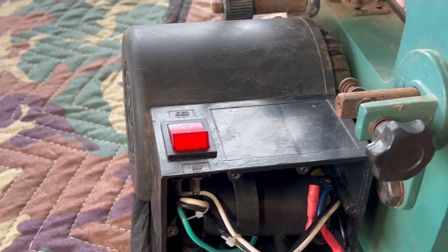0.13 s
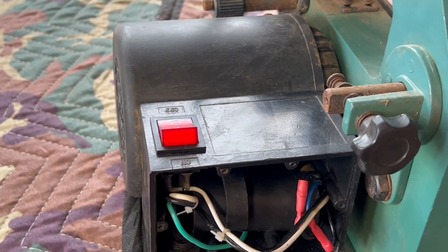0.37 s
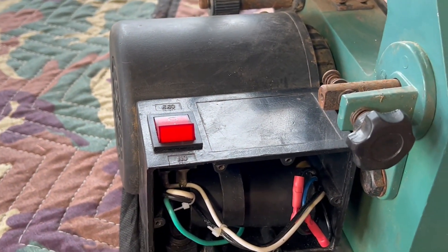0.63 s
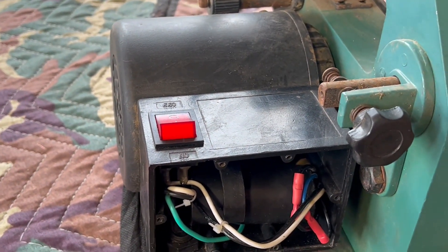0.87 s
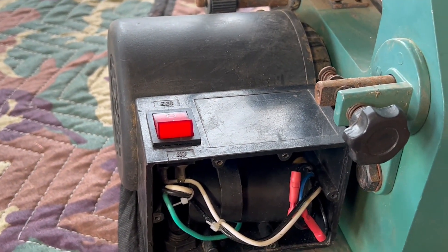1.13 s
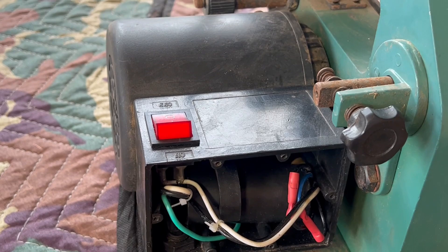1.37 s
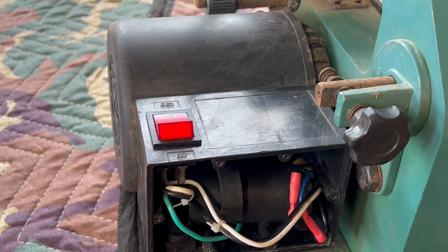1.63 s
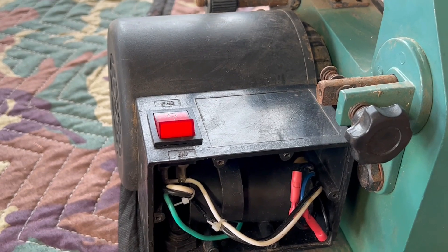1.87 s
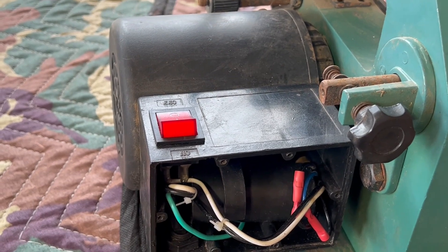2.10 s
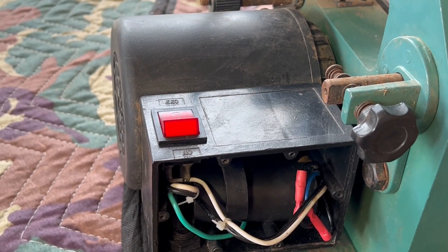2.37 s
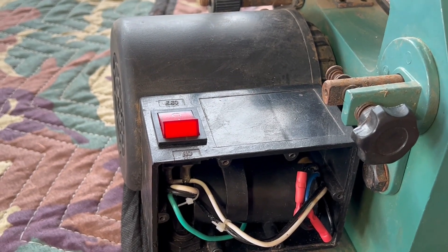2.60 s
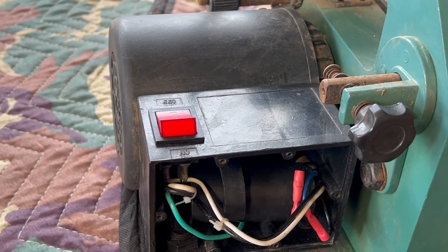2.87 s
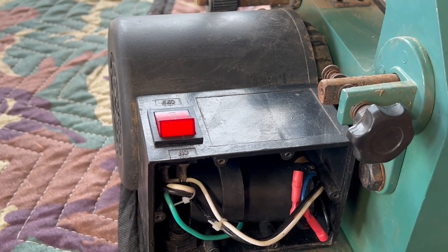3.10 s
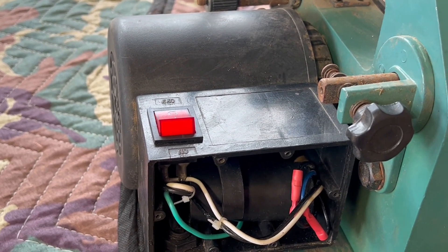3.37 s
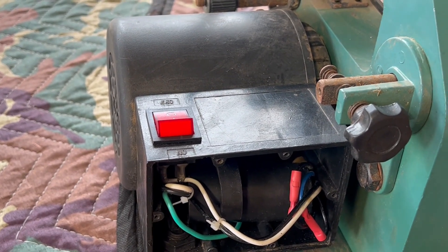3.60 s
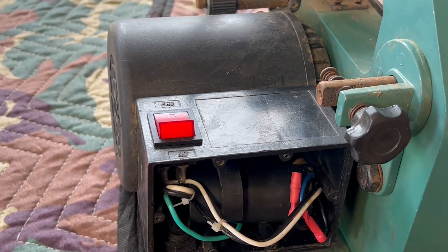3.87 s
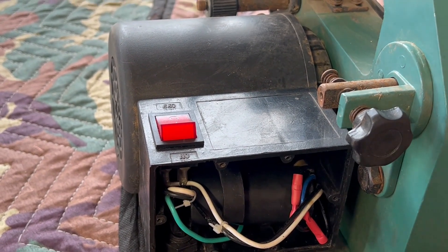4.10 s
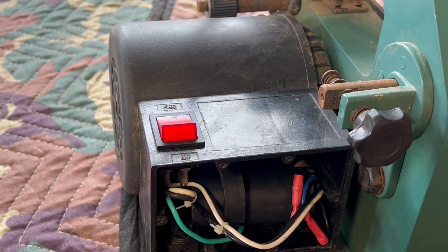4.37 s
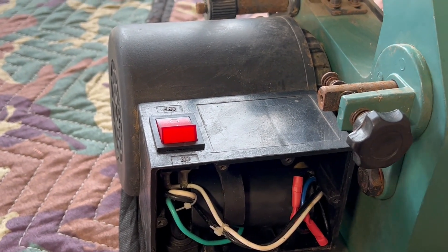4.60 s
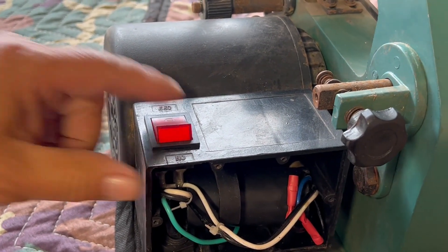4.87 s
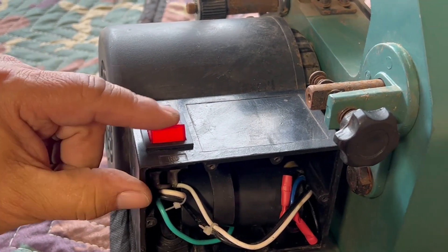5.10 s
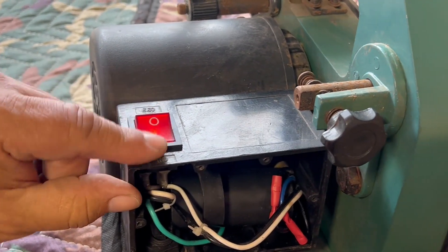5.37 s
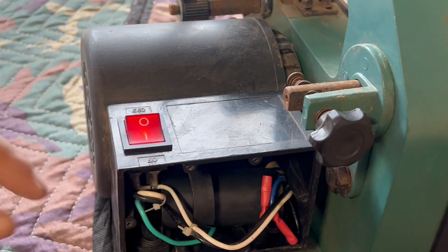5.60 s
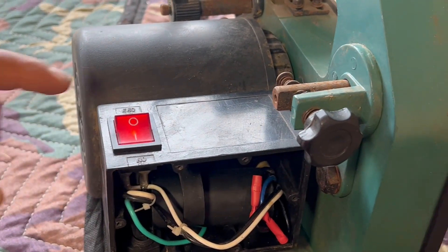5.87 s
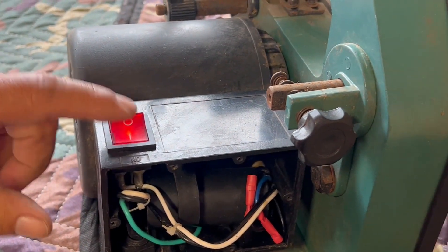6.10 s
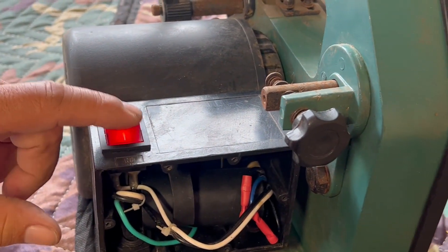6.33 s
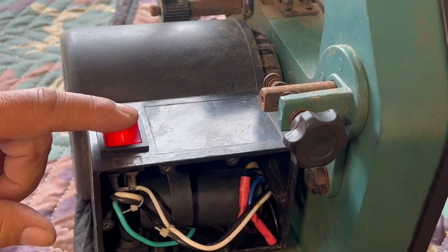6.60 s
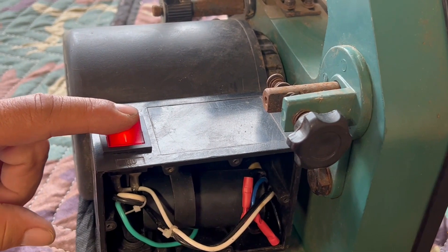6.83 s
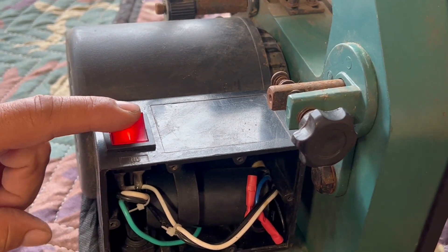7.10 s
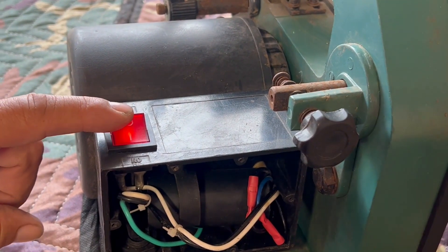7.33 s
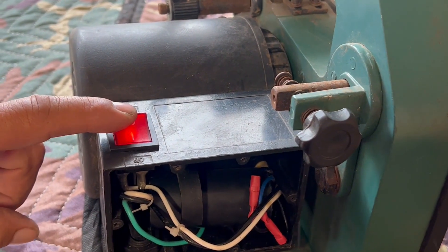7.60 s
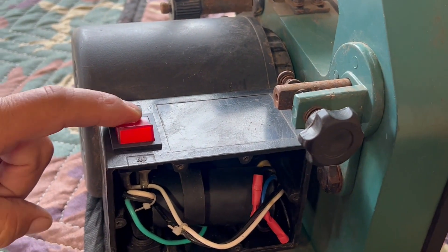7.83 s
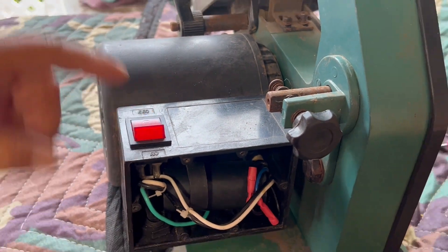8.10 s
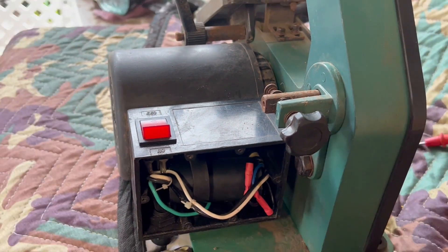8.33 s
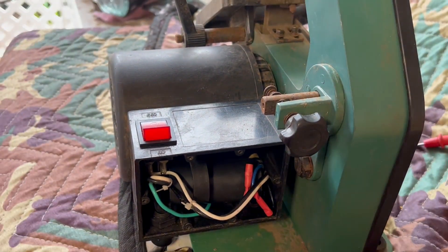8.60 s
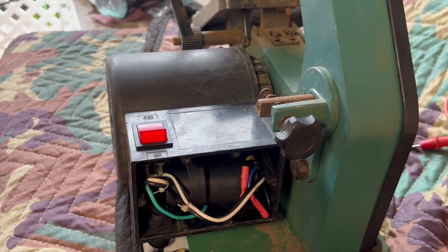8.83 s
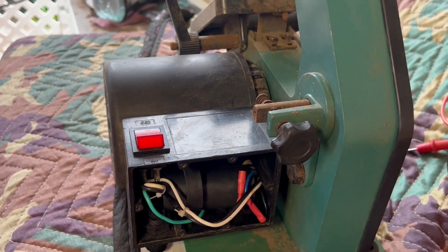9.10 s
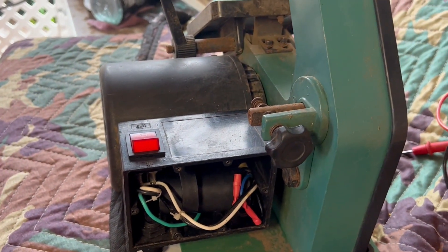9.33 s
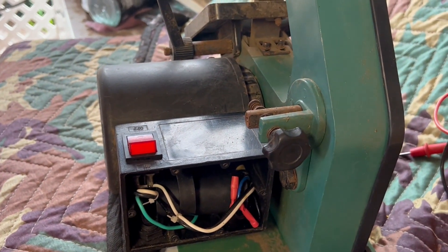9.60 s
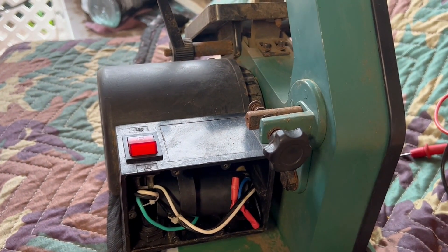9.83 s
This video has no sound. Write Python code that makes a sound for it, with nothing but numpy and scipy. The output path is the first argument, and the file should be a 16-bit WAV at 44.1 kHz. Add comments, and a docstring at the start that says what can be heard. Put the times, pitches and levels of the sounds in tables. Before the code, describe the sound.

Close stereo pickup of a belt sander on a padded surface indoors. Soft fabric rustles and a hollow body knock come over dull room rumble, then a hard plastic switch click starts the electric motor. It whirs up quickly, roars steadily with bearing grind and belt hiss, then a second click cuts power; pitch and level sink to a brief dry scrape and quiet.

```python
"""Low room rumble comes first, with cloth rubbing close by, then small ticks and knocks on a hollow body.
A small belt sander stands on a padded bench in a quiet workshop, heard close up through two microphone ports.
Its rocker switch snaps, the motor runs up, hums and roars through its housing, is switched off and coasts to rest.
Cloth and room are coloured noise and blows are decaying modes; bearing roar, hiss and shake follow the shaft."""
import sys
import numpy as np
from scipy import signal
from scipy.fft import rfft, irfft
from scipy.io import wavfile
from scipy.ndimage import uniform_filter1d, minimum_filter1d

SR = 44100
rng = np.random.default_rng(int(sys.argv[2]) if len(sys.argv) > 2 else 0)


def materialize(psi):
    """Save the field psi as 16-bit PCM at rate SR to the path in sys.argv[1].

    A 1-D psi becomes a single channel; in a 2-D psi each row is a channel.
    """
    bounded = np.clip(np.atleast_2d(psi).T, -1, 1)
    quanta = np.round(bounded * 32767).astype(np.int16)
    wavfile.write(sys.argv[1], SR, quanta)


def field_ratio(decibels):
    """Amplitude ratio for a level in dB (20 dB per decade); scalars and array-likes work."""
    return 10 ** (np.asarray(decibels, dtype=float) / 20)


N = 439236
TIME = np.arange(N) / SR

# colour of the quiet room: f/Hz, density level/dB per Hz (relative)
ROOM_COLOUR = [(15, -49), (25, -28), (54, 2.5), (107, -12.5), (147, -14.5), (208, -23.5), (235, -22),
               (266, -28), (530, -37), (645, -38), (1080, -37), (9000, -74.5), (11700, -102), (19800, -120)]
ROOM_DB = -43.5
# stereo width of the room: f/Hz, side against mid level/dB
ROOM_SIDE = [(40, -30), (130, -16.5), (600, -5.5), (1500, 0.5), (4000, -11.5), (15000, -12.5)]
# stereo width of the motor and the cloth: f/Hz, side against mid level/dB
NEAR_SIDE = [(60, -28), (110, -6), (300, -14), (1300, -14), (3000, -8.5), (6000, -17), (15000, -50)]

# quick flicks of cloth: peak at t/s, dull level/dB, bright level/dB
FLICKS = [(.316, -69, -69), (.37, -74, -74), (.826, -72, -75), (.994, -66, -78), (1.416, -67, -67),
          (1.508, -61, -76), (1.606, -75, -86), (2.226, -68, -84), (2.55, -66, -62.5), (2.724, -62, -86),
          (2.968, -53, -61), (3.172, -69, -71), (3.27, -80, -69), (3.47, -61, -71), (3.888, -70, -90),
          (4.07, -61.5, -61), (4.826, -38.5, -46.5), (5.213, -43, -50), (9.946, -47.5, -58)]
FLICK_RISE_S, FLICK_FADE_DB = 0.01, 422   # fade in dB per s
# longer rubs of cloth and fingers: loudest at t/s, swell t/s, fade t/s, dull level/dB, bright level/dB
RUBS = [(.1, 0.086, .12, -61.5, -54), (.24, .12, 0.067, -63.5, -61), (.52, .05, .08, -57.5, -62),
        (.63, .12, 0.087, -56, -53.5), (3.58, 0.079, 0.085, -41, -41), (3.7, .05, 0.27, -74, -74),
        (4.12, .05, 0.3, -82, -73.5), (4.38, 0.094, 0.075, -59, -57), (5.03, .25, 0.13, -61.5, -62.5),
        (5.254, 0.048, 0.077, -40.5, -46.5), (9.58, 0.032, .07, -60.5, -66), (9.78, 0.43, 0.36, -80, -69)]
RUB_END_DB = -23   # one swell time before the peak or one fade time after it
STIR_DB = (-76, -94.5)   # faint stirring between them: dull, bright

# small ticks: t/s, base level/dB, base f/Hz, left over right level/dB; ticks() sets each ring from these bases
TICKS = [(0.177, -46, 2310, 0), (.3197, -44, 7500, 1.5), (1.419, -43, 5130, 2), (1.61, -51, 8800, 1.5),
         (2.5451, -52, 2040, .4), (2.968, -33, 2220, 4), (3.1737, -54, 7500, 1.5), (3.27, -56, 7500, 1.5),
         (4.0716, -48, 8000, 1.5), (4.3867, -43, 8160, .4), (8.687, -27, 1260, 6), (9.5213, -34.5, 1280, 5),
         (9.537, -34, 1360, 8), (9.9448, -45, 2053, 5)]
# knocks on a hollow body: t/s, level/dB, spot (0 rim, 1 middle)
KNOCKS = [(.4672, -39, 0), (3.4905, -17, 1)]
# modes of the hollow body, against the knock: f/Hz, rim level/dB, middle level/dB, t60/s
HOLLOW_MODES = [(203, -16, -8, .8), (236, -20, -10, .2), (366, -5, -32, .9), (392, -20, -8, .24),
                (535, -6, -6, .24), (600, -8, -16, .1), (972, -20, -21, .16), (1060, -22, -25, .2),
                (1305, -20, -20, .18), (1395, -9, -16, .22), (1643, -20, -21, .15), (1850, -8, -15, .12),
                (2035, -12, -17, .1), (2287, -18, -15, .15), (2670, -9, -22, .08)]
CRACK_DB, CRACK_T60_S = -9, 0.16   # noise burst of a knock, against its level

# faint thin squeaks: t/s, f/Hz, level/dB
SQUEAKS = [(4.92, 7260, -45), (4.94, 7350, -47), (5.318, 5600, -28), (5.321, 4400, -34)]
SQUEAK_T60_S, SQUEAK_RISE_S = .05, .008
# switch snaps: t/s, spring level/dB, landing level/dB
SNAPS = [(5.3378, 1.2, -1.5), (7.7664, -2, -5)]
# switch modes, spring above 5 kHz and landing rocker below: f/Hz, level/dB against the snap, t60/s, delay t/s
ROCKER_MODES = [(8800, 0, .0045, .0003), (7400, -3, .0045, .0004), (3000, -11, .012, 0),
                (4200, -14, .01, .0008), (12500, -20, .004, 0), (6300, -16, .008, .002),
                (2050, -5, .013, .0026), (1100, -19, .02, .001)]

ON_S, OFF_S, HALT_S = 5.34, 7.77, 9.548
FULL_SPEED = 58.75   # shaft turns per s
CAGE_RATIO = 23.88 / 58.75   # cage turns per shaft turn
# run-up: length, power of time by which it gains pace, rounding near full speed
RUN_UP_S, RUN_UP_POWER, SETTLE_S = .475, 1.55, .07
# coasting: the dying field takes FIELD_BRAKE turns per s in all, friction is in turns per s per s
FIELD_BRAKE, FIELD_S, FRICTION = 12.2, .2, 22.75

# levels below come in pairs: bearing roar, fan and belt hiss
FULL_DB = (-23.5, -22)   # at full speed, before slow wander and flutter
LOSS_DB, LOSS_SQUARED_DB = (6.5, 7), (0.42, 1)   # coasting: per halving of speed, per halving squared
PULL_LOSS_DB, PULL_SQUARED_DB = (4.5, 3.5), (-0.06, 0.42)   # the same while power is on
JOLT_DB, JOLT_T60_S = (-30.5, -27), (0.13, 0.098)   # the jolt as current arrives
STALL_S, STALL_DB, STALL_OVER_S = 9.443, (-5.5, -8), 0.089   # the last roll dies away
# the belt scrapes to a halt: level, start before the halt, decay after it
SCRAPE_DB, SCRAPE_S, HALT_T60_S = (-48, -50), .11, 0.094
FLUTTER_DB = 0.89   # slow running is uneven: dB per halving
# slow wander of the running level, end values held before and after: t/s, level/dB
WANDER = [(5.6, -2), (5.8, 1), (5.95, 0.5), (6.15, 1), (6.3, 0.1), (6.55, -0.4), (6.8, -0.1), (7.05, 0.06),
          (7.38, 0.7), (7.75, -1.3), (8.0, -0.5)]

# housing resonances that the bearing excites: f/Hz, width f/Hz, level/dB, loss level/dB as speed halves
CASING = [(164.6, 70, -13.5, -1.5), (359.6, 36, -5.5, -0.5), (399.5, 21, -7, 1.5), (467.6, 36.5, -1, 0),
          (516, 26, 0, 1), (595, 88, -4.5, 2), (704, 94, -5, 0), (909, 128, -4.5, 2.5),
          (1040, 145, -4, 0.5), (1174, 162, -3, 2), (1311, 62, -2.5, 2), (1450.8, 140, -11.5, 0.5),
          (1566, 48, -7.5, 0.5), (1683, 106, -10.5, -0.5)]
# guard and frame resonances that colour the hiss: f/Hz, width f/Hz, level/dB, loss level/dB as speed halves
GUARD = [(2058, 180, -1.5, -1), (2490, 317, -5, -2), (2978, 100, -2.5, -2), (3320, 156, 0.5, 0),
         (3895, 256, 0, -1), (4492, 220, 1, -0.5), (5090, 470, -5, 1), (5636, 136, 0, 1.5),
         (5957, 107, 1, 1.5), (6450, 340, -1.5, 1.5), (7200, 630, -2, 1), (8220, 1320, -5, 1.5),
         (9530, 1300, -6, 2.5), (11090, 1070, -5.5, 3), (13800, 2600, -10, 4), (14700, 3000, -11, 3.5)]
# steady tones at full speed: multiple of the shaft turn, peak level/dB against the roar's rms
SHAFT_ORDERS = [(3, -30.5), (4, -23), (6, -13)]
# steady tones of the bearing cage: multiple of the cage turn, peak level/dB against the roar's rms
CAGE_ORDERS = [(7, -27.5), (19, -17), (24, -17.5), (28, -19.5), (32, -20), (36, -15), (37, -23), (42, -28),
               (44, -16), (50, -17), (51, -19.5), (53, -14.5), (61, -17)]
ONCE_DB, ONCE_LOSS_DB = -37.5, 88   # unbalance once a turn: rms level, loss per halving squared
# twice-a-turn shake as the bench passes it on: f/Hz, level/dB
BENCH = [(40, -68.5), (54, -50), (65, -36), (72, -30), (78, -42), (84, -32), (93, -56), (100, -38.5),
         (115, -37)]
BEAT_S, BEAT_TOP_S, BEAT_DEPTH = 1.96, 6.23, 0.68   # slow beat of that shake: period, loudest at, depth 0-1

MAINS_HZ = 60
# winding buzz under the starting current: multiple of twice the mains rate, starting rms level/dB
BUZZ = [(6, -55), (11, -50), (12, -53.5), (13, -49), (14, -58)]
BUZZ_FADE_DB = 13   # dB per s

# treble reaches the two microphone ports by unequal paths: f/Hz, phase between them/turns
PORT_LAG = [(5000, 0), (7000, -.06), (8500, 0), (10200, .5), (12100, 1), (13900, 1.5), (15700, 2)]
SELF_NOISE_DB, TOP_HZ = -80, 15780   # microphone noise before its colouring, highest frequency kept
DUCK_ABOVE, DUCK_DB, DUCK_AFTER_S, DUCK_HOLD_S = .3, -11, .004, .007


def rms_one(x):
    """Scale to unit rms."""
    return x / np.sqrt(np.mean(x ** 2) + 1e-20)


def in_time(rows):
    """One (t/s, value) curve at every sample."""
    return np.interp(TIME, *np.transpose(rows))


def shaped(x, points):
    """Colour a signal by (f/Hz, level/dB) points."""
    hz, db = np.transpose(points)
    bins = np.maximum(np.fft.rfftfreq(N, 1 / SR), 1)
    return irfft(rfft(x) * field_ratio(np.interp(np.log(bins), np.log(hz), db)), N)


def drift(rate):
    """Smooth random wander of spread near 1, drawn afresh rate times a second."""
    draws = rng.standard_normal(int(10 * rate) + 3)
    steps = uniform_filter1d(np.repeat(draws, 8), size=8)
    return 1.2 * np.interp(TIME * rate * 8, np.arange(len(steps)), steps)


def spread(mid, side, points):
    """Left and right from a middle and an unrelated side of like colour."""
    side = shaped(side, points)
    return np.array([mid + side, mid - side])


def resonate(x, peaks, halvings, waver_db):
    """Parallel resonances of alternating sign; each wavers, and fades in its own way as the speed drops."""
    out = 0
    for k, (hz, width, db, lost_db) in enumerate(peaks):
        r = np.exp(-np.pi * width / SR)
        poles = [1, -2 * r * np.cos(2 * np.pi * hz / SR), r * r]
        zeros = [(1 - r * r) / 2, 0, (r * r - 1) / 2]
        gain = (-1) ** k * field_ratio(db - lost_db * halvings + waver_db * drift(5))
        out = out + gain * signal.lfilter(zeros, poles, x)
    return out / np.std(out[..., halvings < .01])   # unit level at full speed


def add(out, s, hz, db, t60, rise_s=0.00025):
    """Strike one mode at s: a sine that rises fast and dies away exponentially."""
    at = int(s * SR)
    t = np.arange(min(int(t60 * SR), N - at)) / SR
    ring = np.sin(2 * np.pi * hz * t) * field_ratio(-60 * t / t60) * (1 - np.exp(-t / rise_s))
    out[..., at:at + len(t)] += np.multiply.outer(field_ratio(db), ring)


def room():
    """Lumpy low rumble fading into faint hiss: coloured noise at a gently wandering level."""
    noise = rms_one(shaped(rng.standard_normal((2, N)), ROOM_COLOUR))
    mid, side = noise * field_ratio(ROOM_DB + 0.69 * drift(3.174))
    return spread(mid, side, ROOM_SIDE)


def rustle():
    """Fibres slipping: noise with small grains, in a dull and a bright part."""
    gains = np.outer(field_ratio(STIR_DB), field_ratio(3.6 * drift(9.1)))
    for s, *db in FLICKS:
        near = slice(int((s - .05) * SR), int((s + .3) * SR))
        t = TIME[near] - s
        rise = np.clip(1 + t / FLICK_RISE_S, 0, 1) ** 2
        fade = field_ratio(-FLICK_FADE_DB * np.maximum(t, 0))
        gains[:, near] += np.outer(field_ratio(db), rise * fade)
    for s, swell_s, fade_s, *db in RUBS:
        near = slice(max(int((s - 2 * swell_s) * SR), 0), int((s + 2 * fade_s) * SR))
        t = TIME[near] - s
        from_peak = np.where(t < 0, -t / swell_s, t / fade_s)
        gains[:, near] += np.outer(field_ratio(db), field_ratio(RUB_END_DB * from_peak ** 1.76))
    grains = rng.standard_normal((2, N)) * field_ratio(1.74 * drift(200))
    dull = rms_one(shaped(grains, [(150, -2), (400, 5), (1200, 1.5), (2500, -1.0), (4000, -31.0)]))
    bright = rms_one(shaped(grains, [(1500, -40.5), (2600, -1.0), (6000, 2.5), (9000, -0.5),
                                     (12000, -10.0), (16000, -13.5)]))
    mid, side = gains[0] * dull + gains[1] * bright
    return spread(mid, side, NEAR_SIDE) * field_ratio([[.7], [-.7]])   # a little to the left


def ticks():
    """Small hard contacts: a main ring and two weaker modes, shorter the higher the pitch."""
    out = np.zeros((2, N))
    for s, base_db, base_hz, pan_db in TICKS:
        sides_db = base_db + np.array([pan_db, -pan_db]) / 2
        for ratio, db in ((1.02, 4.0), (0.5, -21.0), (1.1, -18.0)):
            add(out, s, min(base_hz * ratio, 15000), sides_db + db, 22 / base_hz)
    return out


def knocks():
    """A hollow body rings in modes weighted by the spot struck, under a short crack of noise."""
    out = np.zeros((2, N))
    crack_colour = [(500, -18), (1000, -5), (2200, 0.0), (6000, -8.0), (16000, -11)]
    crack = rms_one(shaped(rng.standard_normal(N), crack_colour))
    for s, knock_db, spot in KNOCKS:
        sides_db = knock_db + np.array([1.2, -1.2])
        for hz, *db, t60 in HOLLOW_MODES:
            add(out, s, hz, sides_db + db[spot], t60, rise_s=1.5 / hz)   # low modes build up later
        after = np.clip(TIME - s, 0, 1)
        burst = crack * (after > 0) * field_ratio(-60 * after / CRACK_T60_S) * (after < 1)
        out += np.outer(field_ratio(sides_db + CRACK_DB), burst)
    return out


def rocker_switch():
    """Faint squeaks come first, then the switch's spring and landing ring in short modes."""
    out = np.zeros((2, N))
    for s, hz, db in SQUEAKS:
        add(out, s, hz, np.full(2, db), SQUEAK_T60_S, rise_s=SQUEAK_RISE_S)
    for s, spring_db, landing_db in SNAPS:
        for hz, db, t60, delay in ROCKER_MODES:
            part_db = spring_db if hz > 5000 else landing_db
            add(out, s + delay, hz, np.full(2, db + part_db), t60)
    return out


def shaft_speed():
    """Turns per s: pulled up to full speed, then braked by the dying field and by friction."""
    pulled = FULL_SPEED * np.clip((TIME - ON_S) / RUN_UP_S, 0, 1) ** RUN_UP_POWER
    coast = np.maximum(TIME - OFF_S, 0)
    braked = FIELD_BRAKE * (1 - np.exp(-coast / FIELD_S)) + FRICTION * coast
    settled = uniform_filter1d(pulled, size=int(SETTLE_S * SR))
    return np.maximum(settled - braked, 0) * (TIME < HALT_S)


def running_gain(layer, halvings):
    """Level follows speed, with a slow wander; a jolt starts it, a stall and a scrape end it."""
    coasting = LOSS_DB[layer] * halvings + LOSS_SQUARED_DB[layer] * halvings ** 2
    pulling = PULL_LOSS_DB[layer] * halvings + PULL_SQUARED_DB[layer] * halvings ** 2
    loss = np.where(TIME < OFF_S, pulling, coasting)
    flutter = FLUTTER_DB * np.minimum(halvings, 2) * drift(25)
    stall = STALL_DB[layer] * np.exp(np.minimum(TIME - STALL_S, .1) / STALL_OVER_S)
    db = FULL_DB[layer] - loss + stall + flutter + in_time(WANDER)
    jolt = field_ratio(JOLT_DB[layer] - 60 * np.abs(TIME - ON_S - .003) / JOLT_T60_S[layer])
    scrape = field_ratio(SCRAPE_DB[layer]) * np.clip((TIME - HALT_S + SCRAPE_S) / .03, 0, 1)
    halted = field_ratio(-60 * np.maximum(TIME - HALT_S, 0) / HALT_T60_S)
    return (field_ratio(db) + jolt + scrape) * halted * (TIME > ON_S)


def bearing(cage, contacts_db, count=14):
    """Flaws meet the balls at the same cage angles on every turn, over a random rolling noise."""
    out = rng.standard_normal(N)
    for angle, size in rng.random((count, 2)):
        passing = np.diff(np.floor(cage + angle), prepend=np.floor(angle))
        out += passing * field_ratio(contacts_db + 4.0 * drift(30)) * (2 * size - 1)
    return out


def bearing_roar(angle, cage, halvings):
    """Rolling contacts throb with the cage and ring the housing; steady shaft and cage tones join in."""
    throb = 1 + 0.14 * np.cos(4 * np.pi * cage) + 0.12 * np.cos(6 * np.pi * cage + 0.77)
    roar = resonate(throb * bearing(cage, contacts_db=22), CASING, halvings, waver_db=1.0)
    tones = sum(field_ratio(db + 5.4 * drift(5)) * np.sin(k * angle + k * k) for k, db in SHAFT_ORDERS)
    tones += sum(field_ratio(db + drift(4)) * np.sin(k * 2 * np.pi * cage + k * k) for k, db in CAGE_ORDERS)
    return roar + tones * field_ratio(-30 * halvings)   # tones sink into the noise off full speed


def fan_hiss(angle, halvings):
    """Fan and belt noise swells with each turn and is coloured by guard and frame."""
    beat = 1 + 0.06 * np.cos(angle) + 0.11 * np.cos(2 * angle + 0.43)
    noise = beat * field_ratio(0.93 * drift(150)) * rng.standard_normal((2, N))
    return resonate(noise, GUARD, halvings, waver_db=0.77)


def bench_shake(angle, halvings):
    """Unbalance shakes the bench once a turn, and twice a turn with a slow beat under power."""
    once = field_ratio(ONCE_DB - ONCE_LOSS_DB * halvings ** 2 + 1.5 * drift(3)) * np.sin(angle)
    swell = 1 + BEAT_DEPTH * np.cos(2 * np.pi * (TIME - BEAT_TOP_S) / BEAT_S) * (TIME < OFF_S)
    twice = field_ratio(2.0 * drift(12)) * shaped(swell * (halvings < 2) * np.sin(2 * angle), BENCH)
    return np.sqrt(2) * (once + twice) * field_ratio([[.4], [-.4]])


def motor():
    """Roar, hiss and low shaking, all tied to the shaft angle."""
    speed = shaft_speed()
    all_halvings = np.clip(np.log2(FULL_SPEED / (speed + 1e-3)), 0, 6)
    halvings = np.minimum(all_halvings, 3)
    turns = np.cumsum(speed) / SR
    angle, cage = 2 * np.pi * turns, CAGE_RATIO * turns   # radians, turns
    roar = bearing_roar(angle, cage, halvings)
    hiss = fan_hiss(angle, halvings)
    roar_gain = running_gain(0, all_halvings) * field_ratio(0.78 * drift(14))
    hiss_gain = running_gain(1, all_halvings) * field_ratio(.5 * drift(14))
    side_roar = resonate(rng.standard_normal(N), CASING, halvings, waver_db=3.0)
    mid = roar_gain * roar + hiss_gain * hiss[0]
    side = roar_gain * side_roar + hiss_gain * hiss[1]
    return spread(mid, side, NEAR_SIDE) + bench_shake(angle, halvings)


def buzz():
    """Magnetic tones of the windings at fixed pitch, fading as the starting current falls."""
    t = np.maximum(TIME - ON_S, 0)
    tones = sum(field_ratio(db + 3.0 * drift(30)) * np.sin(4 * np.pi * MAINS_HZ * k * t) for k, db in BUZZ)
    return np.sqrt(2) * tones * (t < RUN_UP_S) * field_ratio(-BUZZ_FADE_DB * t)


def scene():
    """Everything at the bench."""
    return room() + rustle() + ticks() + knocks() + rocker_switch() + motor() + buzz()


def top_cut(x):
    """Nothing passes above the cut-off."""
    return signal.sosfilt(signal.butter(12, 16940, fs=SR, output="sos"), x)


def record(dry):
    """Self-noise, two ports with a treble phase lag, a cut top; a sharp treble peak ducks the gain for a moment."""
    bins = np.fft.rfftfreq(N, 1 / SR)
    self_noise = field_ratio(SELF_NOISE_DB) * shaped(rng.standard_normal(N), [(12500, 0.5), (15000, -5.5)])
    hz, turns = np.transpose(PORT_LAG)
    # each port takes half of the phase, in opposite senses
    lag = np.exp(1j * np.pi * np.interp(bins, hz, turns) * np.array([[1], [-1]]))
    heard = irfft(rfft(dry + self_noise) * (bins < TOP_HZ) * lag, N)
    treble_band = signal.butter(4, [6500, 9500], "band", fs=SR, output="sos")
    treble = signal.sosfilt(treble_band, heard.mean(axis=0))
    # the dip begins DUCK_AFTER_S after the peak and lasts DUCK_HOLD_S
    over = np.roll(np.abs(treble) > DUCK_ABOVE, int((DUCK_AFTER_S + DUCK_HOLD_S / 2) * SR))
    held = -minimum_filter1d(-1. * over, size=int(DUCK_HOLD_S * SR))   # running maximum
    mix = heard * field_ratio(DUCK_DB * uniform_filter1d(held, size=40))
    return top_cut(mix)


dry = scene()
out = record(dry)
materialize(out)
```